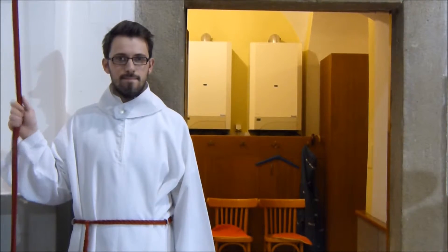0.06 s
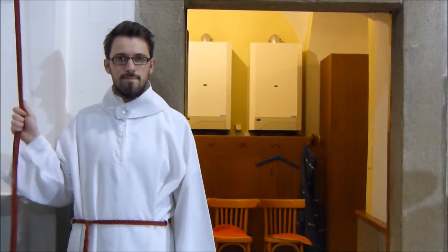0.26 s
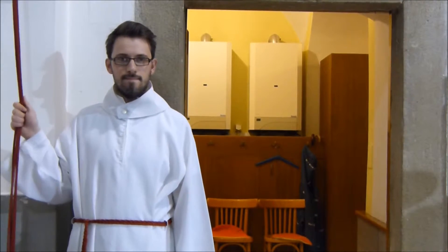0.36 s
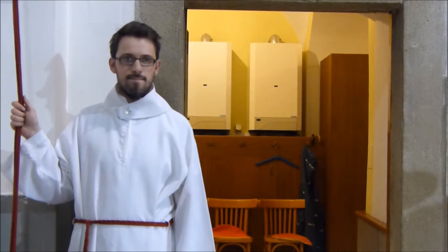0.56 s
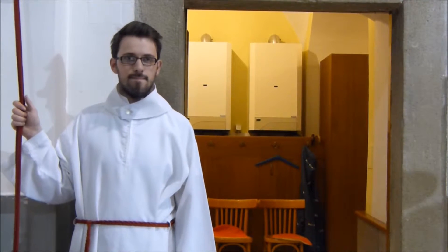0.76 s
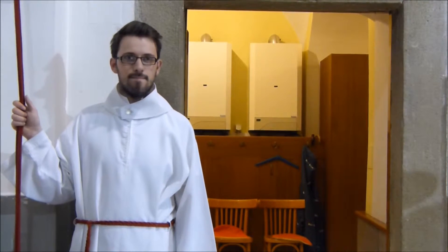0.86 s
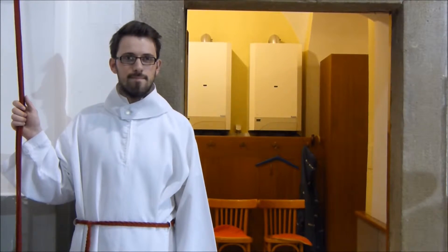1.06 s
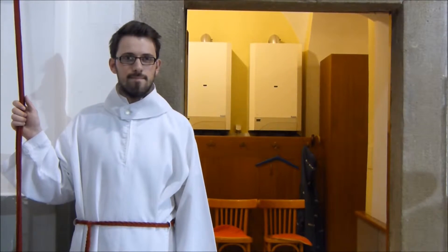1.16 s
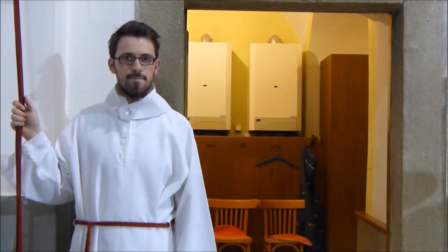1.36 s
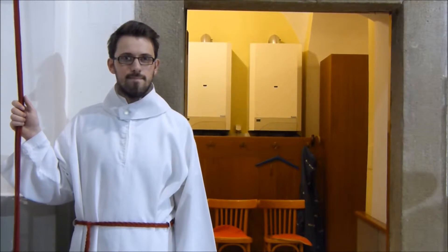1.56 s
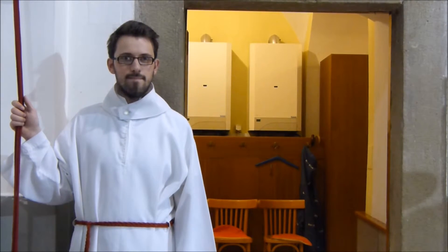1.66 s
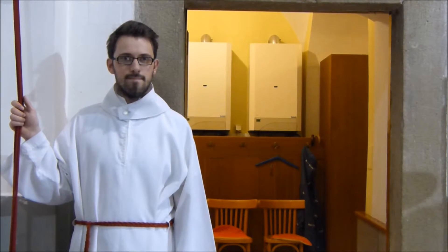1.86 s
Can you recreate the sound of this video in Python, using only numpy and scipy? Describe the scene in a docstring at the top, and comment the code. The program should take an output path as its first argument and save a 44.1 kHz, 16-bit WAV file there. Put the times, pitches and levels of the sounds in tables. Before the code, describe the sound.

A small bell is struck once, its bright ring slowly fading in a hall.

```python
"""A wall bell in a stone hall

A small bell is struck once: the clapper hits, chatters and touches lightly once more. Each impact
excites short-lived modes, and the bell rings on in pairs of nearly equal frequency, which beat.
Reverberation carries the clang over a faint electric hum. An automatic gain control ducks at the
blow and slowly lets the ring swell back."""
import sys
import numpy as np
from scipy import signal
from scipy.fft import rfft, irfft, next_fast_len
from scipy.io import wavfile

SR = 44100
rng = np.random.default_rng(int(sys.argv[2]) if len(sys.argv) > 2 else 0)


def output_pcm(signal):
    """Save a mono or channel-first signal as 16-bit PCM at the path in sys.argv[1].

    Samples are clipped to [-1, 1] before scaling.
    """
    pcm = np.clip(np.atleast_2d(signal).T, -1, 1) * 32767
    wavfile.write(sys.argv[1], SR, np.round(pcm).astype(np.int16))


N = 83790

# the bell's lasting mode pairs (frequency [Hz], twin's offset [Hz], antiphase time after the blow [s])
MODE_PAIRS = [(1145.4, 1.1, .7), (2847.2, -1, .29), (5082.9, -3.15, .035), (6121, 6, .05),
              (7829.3, -12, .028), (10162, 7, .05), (11046, 7, .09), (14758, 17, .03), (15528, 11, .06)]
# their ringing (level [dB], t60 [s], left-right [dB], twin's relative level [dB], twin's left-right [dB])
PAIR_RINGING = [(-35.5, 15.8, 12, -12.5, 4), (-32, 14, 9, -7, 10.5), (1.5, 3.05, 4, -4, -1),
                (-30, 1.4, -1.5, -13.5, -0.5), (5, 1.157, 3.5, 2, -1), (-26, 1.3, 0, -13, -1),
                (-7.5, 0.55, -4.5, -12, -2), (-9, .42, 5.5, -10.5, 0.5), (-11, 0.46, 7.5, -13, -1.5)]
# wavering of the ring as it fades (time [s], level [dB])
RING_WAVER = [(0.228, 1), (0.348, 1.5), (.5, -0.5), (.63, 2.5), (.82, 1), (.98, 2.5), (1.171, 1), (1.27, 1),
              (1.48, -0.5), (1.62, 1.5), (1.88, 1)]
# clapper contacts (time [s], level [dB], excited band's centre [Hz], width [octaves], crack level [dB])
CONTACTS = [(0.2137, 11.5, 7480, 0.26, -8.5), (0.222, 17, 11450, 0.28, -13), (.472, -37, 10900, 0.39, -29)]
# short-lived modes of bell and clapper (frequency [Hz])
CLANG_HZ = [1560, 2815, 4290, 6115, 6460, 8244, 8385, 9385, 10840, 11050, 11543, 13230]
# their ringing (level [dB], t60 [s])
CLANG_RINGING = [(-28.5, 0.3), (-12.5, 0.05), (-10.5, 0.045), (-7, 0.054), (-9.5, 0.033), (-1.5, 0.062),
                 (-16.5, .07), (-8.5, .07), (-11.5, 0.077), (-1.5, 0.11), (-10.5, .07), (-10.5, 0.057)]
# noise of a contact (frequency [Hz], relative density [dB])
CRACK_SPECTRUM = [(25, -32.5), (100, -22), (200, -14.5), (400, 4.5), (800, -4.5), (1600, -5), (3000, -7.5),
                  (6500, -3.5), (12000, -9.5), (15500, -15.5)]
# the blow's diffuse sound in the hall (frequency [Hz], relative density [dB])
WASH_SPECTRUM = [(100, -33), (430, -21.5), (700, -8.5), (1000, -15), (1400, -6), (2000, -19), (3500, -16),
                 (4400, -8), (5600, 1.5), (6300, -16), (7200, -0.5), (9500, -1.5), (11300, 7), (13500, 0.5),
                 (15500, -3)]
# the hall's reverberation time (frequency [Hz], t60 [s])
HALL_T60 = [(200, 3.3), (1300, 3.64), (2500, 3.15), (4400, 1.96), (6500, 1.2), (9000, .9), (11500, 0.69),
            (15000, 0.59)]
# left-right likeness of diffuse sound (frequency [Hz], coherence [ratio])
COHERENCE = [(60, .93), (250, 0.27), (700, 0.26), (2000, 0.69), (6000, 0.88), (14000, 0.35)]
# harmonics in the electric hum (multiple of the mains frequency [ratio])
HUM_HARMONICS = [4, 6, 20, 26, 28, 40, 48, 56]
# their strengths (rms level [dB], left-right [dB])
HUM_LEVELS = [(-58, -3), (-61.5, 1.5), (-66.5, -0.5), (-61.5, 2.5), (-56, 7), (-65.5, 2), (-77, -5.5),
              (-69, 2.5)]
# still air in the hall (frequency [Hz], relative density [dB])
AIR_SPECTRUM = [(25, -18), (70, -11), (170, -1), (400, 0), (700, -5.5), (1400, -4.5), (3000, -10.5),
                (6000, -14), (10000, -12), (15000, -24.5)]
# a soft rustle before the blow (frequency [Hz], relative density [dB])
RUSTLE_SPECTRUM = [(40, -34), (120, -6), (190, -6.5), (400, -2), (700, -10.5), (3000, -33.5)]

STRIKE_S = 0.2135


def bell_ring(rise_s=0.013, twin_rise_s=0.12, reverb_db=-19):
    """Beating: each damped mode interferes with its detuned twin, differently at each microphone."""
    t, ring = since_arrival(STRIKE_S), np.zeros((2, N))
    swell, twin_swell = 1 - np.exp(-t / rise_s), 1 - np.exp(-t / twin_rise_s)
    for (hz, split_hz, dip_s), (db, t60, side_db, twin_db, twin_side_db) in zip(MODE_PAIRS, PAIR_RINGING):
        main = pan(side_db) * swell * np.sin(2 * np.pi * hz * t)
        twin = pan(twin_side_db) * twin_swell * np.sin(2 * np.pi * (hz * t + split_hz * (t - dip_s)))
        ring += amp(db) * (main - amp(twin_db) * twin) * decay(t, t60)
    waver = amp(np.interp(since(0), *np.transpose(RING_WAVER)))
    return (ring + amp(reverb_db) * hall_reverb(ring.mean(axis=0))) * waver


def clapper(rise_s=0.0011, off_band_db=-12, crack_lead_s=0.0023,
            scrape_s=0.012, scrape_db=-25, reverb_db=-7.5):
    """Impact excitation: each contact cracks and drives most strongly the modes near its own band."""
    clang, crack_envelope = np.zeros((2, N)), np.zeros(N)
    for contact_s, db, centre_hz, octaves, crack_db in CONTACTS:
        t = since_arrival(contact_s)
        onset = 1 - np.exp(-t / rise_s)
        for hz, (mode_db, t60) in zip(CLANG_HZ, CLANG_RINGING):
            drive_db = off_band_db * (1 - np.exp(-(np.log2(hz / centre_hz) / octaves) ** 2))
            clang += amp(db + mode_db + drive_db) * onset * decay(t, t60) * np.sin(2 * np.pi * hz * t)
        crack_age = since(contact_s - crack_lead_s)
        crack_onset = 1 - np.exp(-(crack_age / crack_lead_s) ** 2)
        crack_envelope += amp(crack_db) * crack_onset * decay(crack_age, t60=0.034)
    # the clapper scrapes just before it lands
    before_blow = since(STRIKE_S) == 0
    scrape_envelope = amp(scrape_db) * np.sqrt(since(STRIKE_S - scrape_s) / scrape_s) * before_blow
    contact_noise = (crack_envelope + scrape_envelope) * diffuse_noise(CRACK_SPECTRUM)
    return clang + contact_noise + amp(reverb_db) * hall_reverb(clang.mean(axis=0))


def hall_wash(level_db=-9, rise_s=0.0033):
    """Reverberant field: the blow spreads through the hall and darkens as it dies."""
    build_up = 1 - np.exp(-since(STRIKE_S) / rise_s)
    return amp(level_db) * build_up * absorb(diffuse_noise(WASH_SPECTRUM), STRIKE_S)


def hall_reverb(x):
    """Convolution: the hall answers a sound with its impulse response, a tail of decaying noise."""
    tail = absorb(diffuse_noise([(1, 0), (SR, 0)]), 0)
    return signal.fftconvolve(x[None], tail / np.linalg.norm(tail[0]), axes=1)[:, :N]


def absorb(x, start_s):
    """Absorption: from start_s on, each frequency dies at the hall's rate, the treble fastest."""
    hz, t, spectra = signal.stft(x, SR, nperseg=512)
    remaining = decay(np.maximum(t - start_s, 0), curve_at(HALL_T60, hz)[:, None])
    return signal.istft(spectra * remaining, SR, nperseg=512)[1][:, :N]


def room_tone(mains_hz=50, air_db=-55, rustle_db=-54, rustle_peak_s=0.07, rustle_width_s=0.12):
    """Ambient noise: mains harmonics hum over still air and one soft rustle."""
    t, hum = since(0), np.zeros((2, N))
    for harmonic, (db, side_db) in zip(HUM_HARMONICS, HUM_LEVELS):
        phase = 2 * np.pi * (harmonic * mains_hz * t + rng.random())
        hum += pan(side_db) * amp(db) * np.sqrt(2) * np.sin(phase)
    air = amp(air_db) * diffuse_noise(AIR_SPECTRUM)
    rustle_envelope = amp(rustle_db) * np.exp(-((t - rustle_peak_s) / rustle_width_s) ** 2)
    return hum + air + rustle_envelope * diffuse_noise(RUSTLE_SPECTRUM)


def diffuse_noise(spectrum):
    """Partial coherence: independent mid and side noises mix into a stereo field of rms 1."""
    def mid_side_gains(hz):
        angle = np.arccos(np.clip(curve_at(COHERENCE, hz), -1, 1)) / 2
        return amp(curve_at(spectrum, hz)) * [np.cos(angle), np.sin(angle)]
    mid, side = filtered(rng.standard_normal((2, N)), mid_side_gains)
    pair = np.array([mid + side, mid - side])
    return pair / pair.std()


def since_arrival(start_s, right_lag_s=0.000011):
    """Path difference: seconds since a sound reached the left microphone and, later, the right."""
    return np.array([since(start_s), since(start_s + right_lag_s)])


def since(start_s):
    """Causality: seconds elapsed after start_s, zero before it."""
    return np.maximum(np.arange(N) / SR - start_s, 0)


def decay(t, t60):
    """Exponential damping: the amplitude falls 60 dB in t60 seconds."""
    return np.exp(-np.log(1000) * np.minimum(t / t60, 10))


def pan(db):
    """Level difference: left and right gains that lie db apart."""
    return amp(np.array([[db], [-db]]) / 2)


def amp(db):
    """Decibel law: 20 dB is a tenfold amplitude."""
    return 10 ** (np.asarray(db) / 20)


def curve_at(points, hz):
    """Interpolation: (frequency [Hz], value) points read on a logarithmic frequency axis."""
    frequencies, values = np.transpose(points)
    return np.interp(np.log(hz + 1), np.log(frequencies + 1), values)


def filtered(x, response):
    """Linear filtering: the spectrum of x is multiplied by a frequency response."""
    size = next_fast_len(N + SR // 2)
    return irfft(rfft(x, size) * response(np.fft.rfftfreq(size, 1 / SR)), size)[..., :N]


def scene():
    """Superposition: the bell, a little to the left, adds to the hall's wash and the room tone."""
    return bell_ring() + pan(db=0.5) * (clapper() + hall_wash()) + room_tone()


def record(dry, threshold_db=-5.5, max_cut_db=29.5, attack_s=0.004, release_s=0.42, lowpass_hz=15800):
    """Automatic gain control: it ducks fast and recovers slowly; the first peak clips before it acts."""
    peak_db = 20 * np.log10(np.abs(dry).max(axis=0) + 1e-9)
    over_db = np.clip(peak_db - threshold_db, 0, max_cut_db)
    release = np.exp(-since(0) / release_s)
    held_db = release * np.maximum.accumulate(over_db / release)
    attack_pole = np.exp(-1 / (attack_s * SR))
    cut_db = signal.lfilter([1 - attack_pole], [1, -attack_pole], held_db)
    clipped = np.clip(dry * amp(-cut_db), -1, 1)
    return filtered(clipped, lambda hz: hz < lowpass_hz)


dry = scene()
out = record(dry)
output_pcm(out)
```